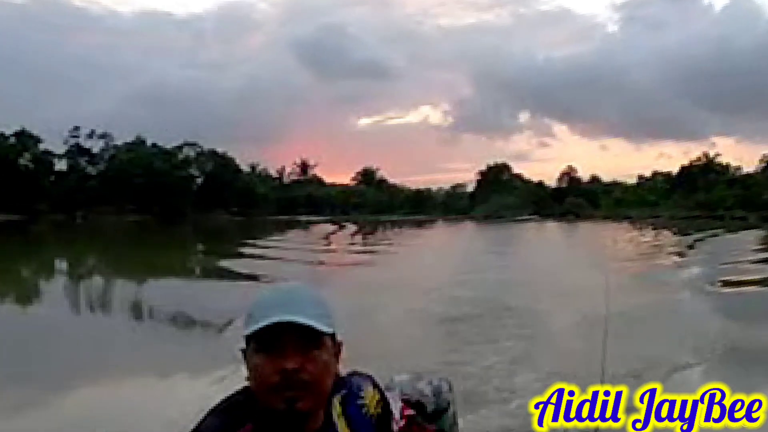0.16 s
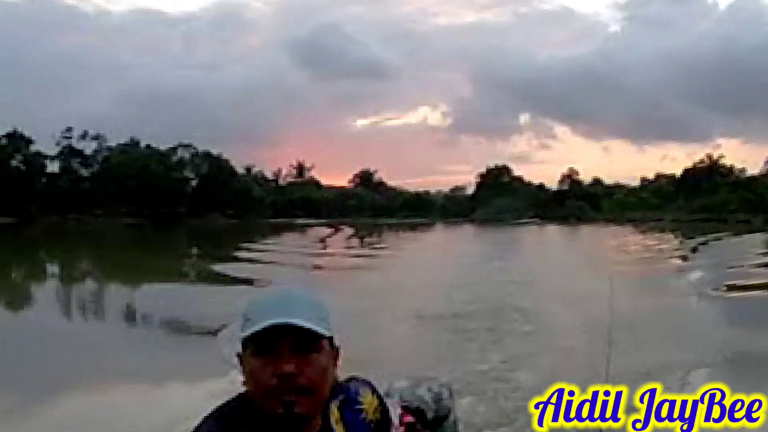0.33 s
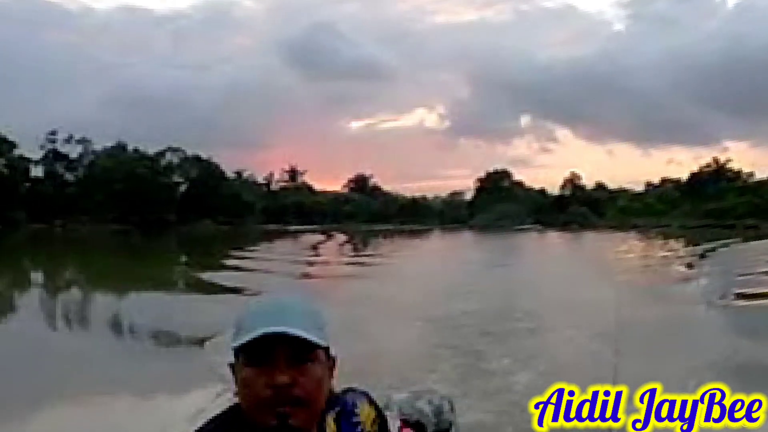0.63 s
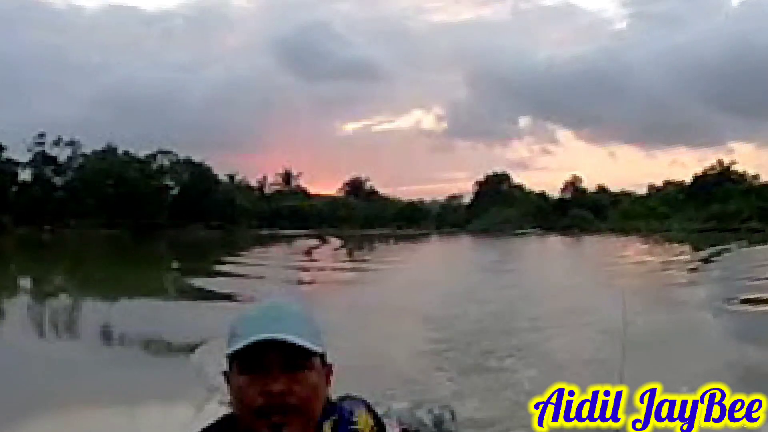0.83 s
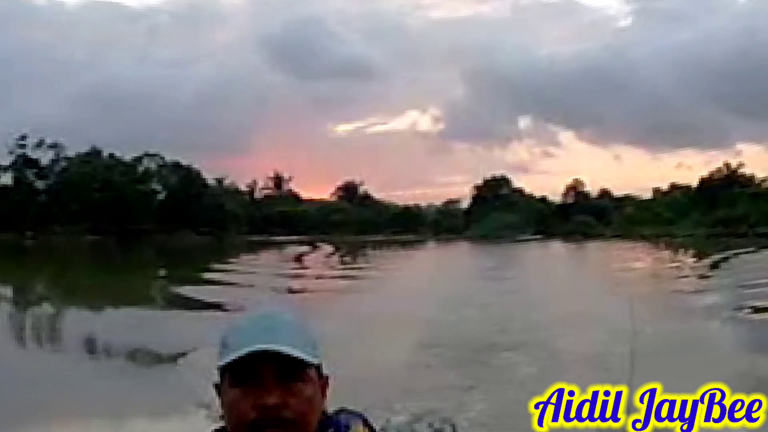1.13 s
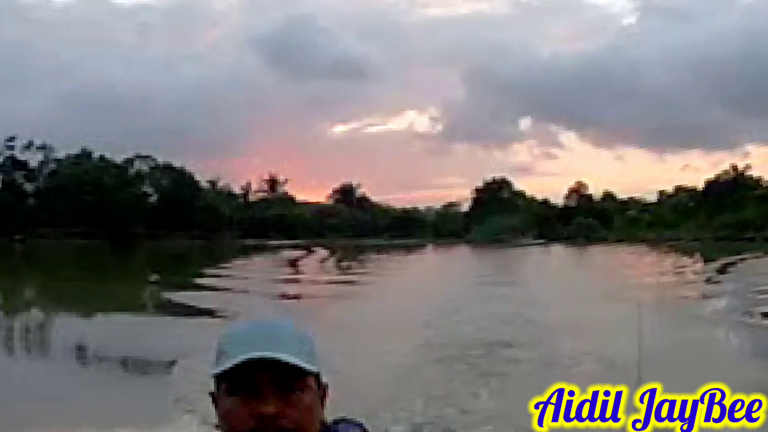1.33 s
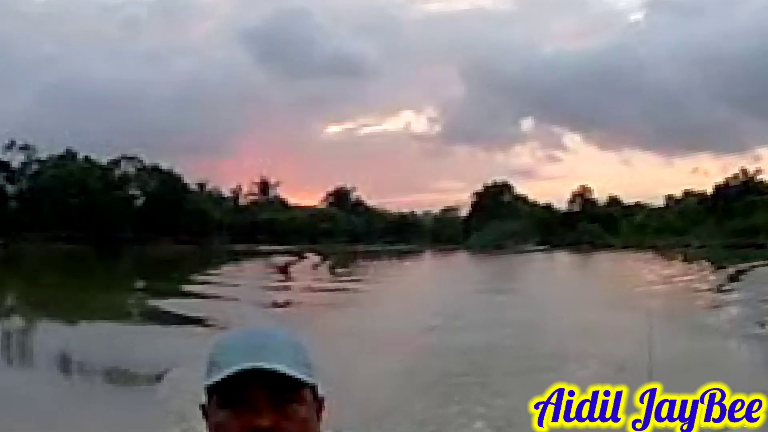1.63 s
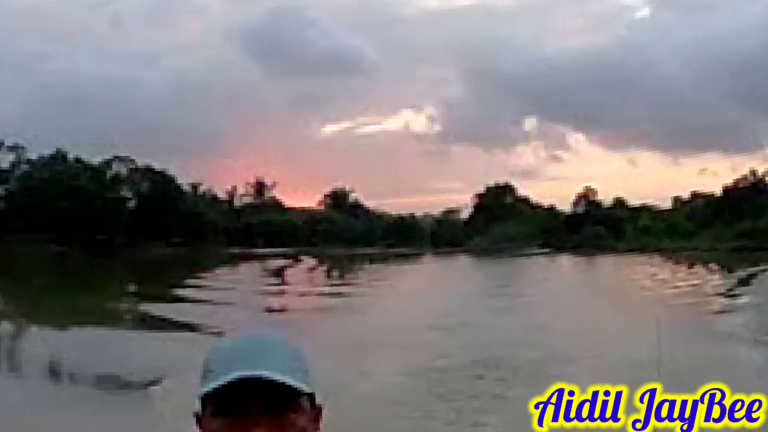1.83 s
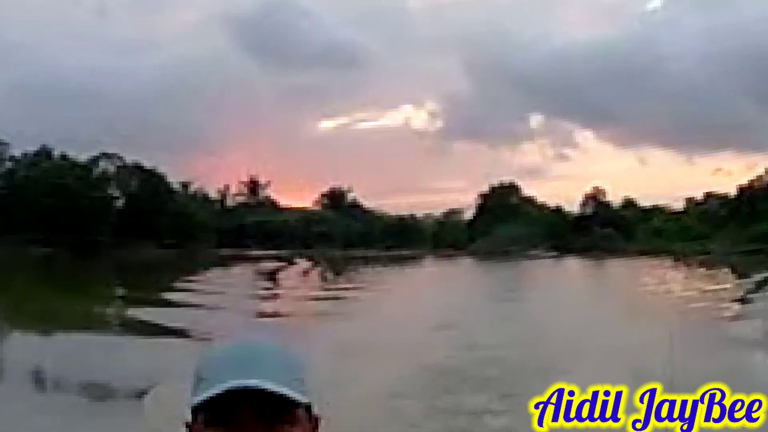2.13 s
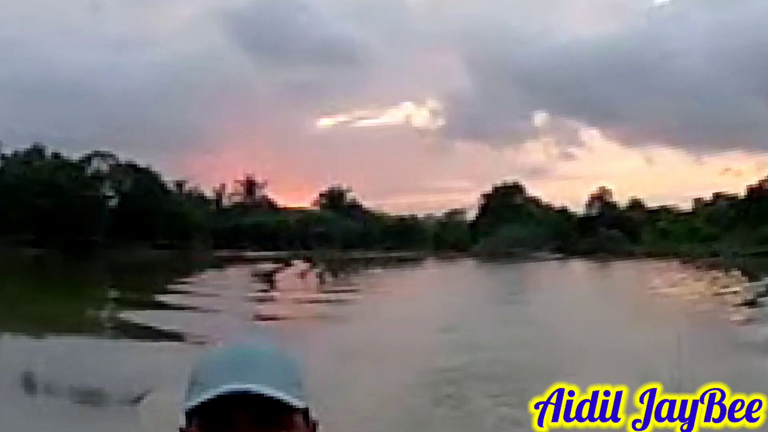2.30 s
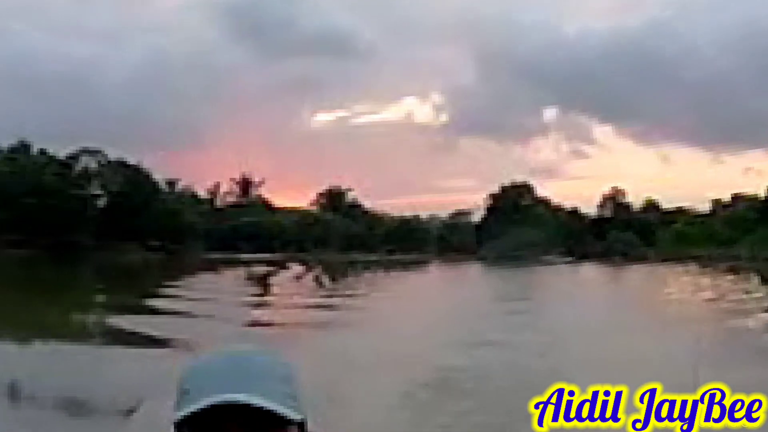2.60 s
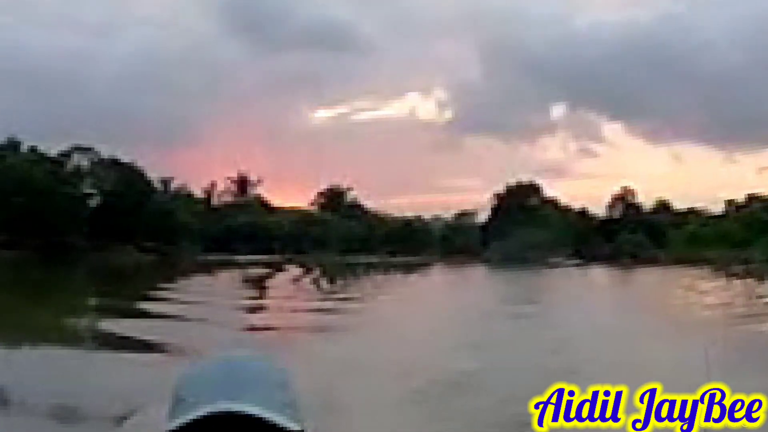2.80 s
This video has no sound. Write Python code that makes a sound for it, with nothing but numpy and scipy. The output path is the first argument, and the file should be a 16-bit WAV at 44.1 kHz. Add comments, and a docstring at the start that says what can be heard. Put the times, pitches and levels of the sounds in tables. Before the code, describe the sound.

An outboard motor drones at a constant speed for the whole three seconds, heard on board a small boat, with a rough low burble, a buzzing rattle and a fast, bright clatter. Beneath it the wake hisses steadily and a few drops splash close by. From about 2.7 seconds, water slaps the hull in two quick clusters of soft, low thuds as churning swells.

```python
"""An outboard motor drives a small boat along a calm river, heard on board a few steps away.
The exhaust drones on multiples of the engine's cycle rate, over a rough burble that puffs once a cycle.
The engine block buzzes, the cover rattles and the valves clatter. The wake hisses and spits spray.
Near the end the hull meets a ripple and thumps through it."""
import sys
import numpy as np
from scipy import signal
from scipy.fft import rfft, irfft, next_fast_len
from scipy.io import wavfile
from scipy.ndimage import uniform_filter1d, map_coordinates

SR = 44100
rng = np.random.default_rng(int(sys.argv[2]) if len(sys.argv) > 2 else 0)


def dump(signal):
    """Clip the signal to [-1, 1] and save it as 16-bit WAV at the path in sys.argv[1]."""
    limited = np.clip(np.atleast_2d(signal).T, -1, 1)
    pcm = np.round(limited * 32767).astype(np.int16)
    wavfile.write(sys.argv[1], SR, pcm)


N = 130095

# tone colour of the foam's hiss: f/Hz, relative level/dB
FOAM_COLOUR = [(300, -8.5), (1000, -4), (2200, -4.5), (3400, -6.5), (4500, -6.5), (6400, -11), (8100, -10),
               (9200, -19), (11000, -33), (13700, -33), (15000, -30)]
# drops landing close by: t/s, level/dB
CLOSE_DROPS = [(.068, -22), (1.0664, -28), (1.4553, -20), (1.845, -31), (2.565, -16), (2.634, -24),
               (2.733, -26), (2.9305, -28)]
# tone colour of those drops: f/Hz, gain/dB
CLOSE_DROP_COLOUR = [(2000, -25), (5500, -9), (6800, 2), (8200, -1), (9500, 0), (11500, -11), (13500, -17),
                     (15200, -8)]
# water slapping the hull: t/s, level/dB, f/Hz, length/s
HULL_SLAPS = [(2.731, -5, 150, 0.0083), (2.7645, -12, 190, .006), (2.786, -18, 140, 0.011),
              (2.808, -19, 150, 0.0065), (2.8955, -7, 150, .011), (2.901, -12, 251.4, .009),
              (2.918, -12, 161, 0.016), (2.933, -21, 139, .009), (2.941, -9, 140, 0.011),
              (2.947, -7, 357, .011)]
# water churning under the hull: t/s, level/dB
CHURN_LEVEL = [(0, -68), (2.4, -47), (2.7, -38), (2.74, -24), (2.86, -33), (2.9, -25.5), (2.95, -14)]
# tone colour of the churning: f/Hz, relative level/dB
CHURN_TONE = [(20, -22), (50, 0), (120, -7), (250, 1.5), (400, -0.5), (700, -14), (1500, -40), (4000, -55)]
# slight swell of the foam and valves together: t/s, gain/dB
TREBLE_SWELL = [(0, 0), (.4, -1.5), (.7, .5), (1.05, .5), (1.3, -0.3), (1.8, -.5), (1.97, 0.5), (2.4, -0.2),
                (2.7, 1), (2.95, 1)]
# a low and a high ringing of the motor's body: t/s, level/dB
LOW_RING_SWELL = [(0, -48), (.13, -36), (.23, -38.5), (.33, -47), (.46, -36), (.6, -40), (1.4, -49),
                  (1.47, -39), (1.55, -45), (1.64, -34.5), (1.75, -46), (2.6, -47), (2.7, -41), (2.8, -59)]
HIGH_RING_SWELL = [(0, -52), (.45, -49), (.57, -40), (.68, -53), (1.65, -46), (1.78, -53), (1.95, -44),
                   (2.2, -59), (2.32, -42), (2.57, -62), (2.77, -42), (2.95, -52)]
# tone colours of the cover, the valves and the exhaust's burble: f/Hz, relative level/dB
COVER_COLOUR = [(300, -51), (700, -9.5), (1150, 1), (1400, -2.5), (1900, -3.5), (2300, -7.5), (3300, -13.5),
                (5000, -24), (9000, -50)]
VALVE_COLOUR = [(1200, -27), (2500, -5.5), (3400, -7), (4300, -2), (5400, -4), (6300, 1), (7200, -3),
                (8100, -8.5), (9100, -3.5), (10200, -10), (11200, -17), (13700, -23.5), (14800, -17),
                (15500, -15)]
BURBLE_COLOUR = [(20, -42), (35, -31), (50, -19), (62, -36), (80, -4), (110, -3.5), (165, 3), (215, -1.5),
                 (275, -2), (330, -12), (385, -1), (440, -9), (490, -6.5), (540, -7.5), (585, 0.5),
                 (630, -4.5), (700, -12), (830, -10.5), (1000, -15.5), (1400, -23), (3000, -63)]
# engine speed, in working cycles a second: t/s, f/Hz
CYCLE_RATE = [(0.0, 46.45), (0.52, 46.51), (0.62, 46.7), (0.69, 46.4), (1.19, 46.26), (1.27, 46.23),
              (2.03, 46.49), (2.1, 46.81), (2.32, 46.46), (2.46, 46.5), (2.52, 46.42), (2.67, 46.59),
              (2.82, 45.9), (2.95, 45.9)]
# tones of the engine block and of the exhaust: multiple of the cycle rate, relative level/dB
BLOCK_TONES = [(26, -30.5), (28, -31), (31, -38), (33, -30), (37, -27.5), (39, -27.5), (40, -33.5),
               (41, -26.5), (43, -31.5)]
EXHAUST_TONES = [(2, -3), (3, -25), (4, 0), (7, -25), (9, -18.5), (10, -24.5), (12, -23), (13, -5.5),
                 (14, -33.5), (16, -25), (18, -29), (19, -29.5), (20, -36)]
# strength of the exhaust's drone: t/s, gain/dB
DRONE_GAIN = [(0, -23.5), (.8, -22.5), (1.5, -23), (1.68, -25), (1.76, -24.5), (1.83, -22), (2.4, -22.5),
              (2.95, -21)]
# two more exhaust tones, at 5 and 8 times the cycle rate: t/s, level/dB
FIFTH_LEVEL = [(0, -34), (.6, -32), (1.15, -35), (1.24, -35), (1.32, -36), (1.55, -38), (1.73, -34.5),
               (1.85, -39), (1.98, -40), (2.17, -41), (2.28, -31), (2.95, -27.5)]
EIGHTH_LEVEL = [(0, -35), (.27, -38.5), (.5, -50), (.6, -34), (1.1, -35.5), (1.19, -34), (1.27, -33),
                (1.38, -34), (1.6, -39), (1.67, -34), (2.3, -36), (2.95, -41.5)]


def amp(db):
    """Decibels to gain."""
    return 10 ** (np.asarray(db) / 20)


def unit(x):
    """Scale to rms 1."""
    return x / np.sqrt(np.mean(x ** 2) + 1e-20)


def curve(rows):
    """(s, value) points as one value per sample."""
    return np.interp(np.arange(N) / SR, *np.transpose(rows))


def wobble(rate):
    """A smooth random curve, rate knots a second."""
    return map_coordinates(rng.standard_normal(2000), [np.arange(N) * rate / SR + 4], mode="wrap")


def filtered(x, response):
    """x times a response of frequency."""
    m = next_fast_len(N + 8192)
    return irfft(rfft(x, m) * response(np.fft.rfftfreq(m, 1 / SR)), m)[:N]


def coloured(x, points):
    """x through a spectrum of (Hz, dB) points."""
    f, db = np.transpose(points)
    return filtered(x, lambda hz: amp(np.interp(np.log(hz + 1), np.log(f + 1), db)))


def noise(points):
    """Coloured noise of rms 1."""
    return unit(coloured(rng.standard_normal(N), points))


def add(track, s, sound):
    """Mix a sound in at time s."""
    part = track[max(0, round(s * SR)):][:len(sound)]
    part += sound[:len(part)]


def patchy_noise(colour, depth_db):
    """Coloured noise whose narrow bands swell and fade separately."""
    bands = signal.stft(rng.standard_normal(N), nperseg=512)[2]
    swells = uniform_filter1d(rng.standard_normal(bands.shape), size=4, axis=0)  # smooth over pitch
    swells = uniform_filter1d(swells, size=12, axis=1)  # smooth over time
    uneven = signal.istft(bands * amp(depth_db * unit(swells)), nperseg=512)[1][:N]
    return unit(coloured(uneven, colour))


def engine_tones(cycles, tones, flutter, jitter):
    """Tones on multiples of the cycle rate; flutter shakes their strength, jitter their timing."""
    shake_hz = 45.18
    out = np.zeros(N)
    for multiple, db in tones:
        offset = 0.044 * rng.uniform(-1.026, 1)  # small, so low tones stay in step as one pulse
        phase = 2 * np.pi * round(multiple) * (cycles + offset) + jitter * wobble(shake_hz)
        strength = amp(db) * (1 + flutter * wobble(shake_hz))
        out -= strength * np.sqrt(2) * np.cos(phase)
    return out


def side_echoes(sound, spread_s=.016, echo_db=-11.5):
    """Eight quick echoes off the boat's sides colour the sound."""
    taps = np.zeros(SR // 20)
    taps[0] = 1  # the direct sound
    for delay, size in rng.random((8, 2)):
        taps[int(spread_s * SR * (.1 + delay))] += amp(echo_db) * (2 * size - 1)
    return signal.fftconvolve(sound, taps / np.linalg.norm(taps))[:N]


def foam():
    """The wake foams behind the boat with a steady hiss."""
    return amp(-41 + 1.1 * wobble(25.1)) * patchy_noise(FOAM_COLOUR, depth_db=-0.5)


def spray(drops_per_s=110, centre_hz=7000, spread_octaves=0.28, fade_s=0.0043):
    """A few close drops splash as bursts of noise; many fine ones ping, each at its own pitch."""
    t = np.arange(SR // 50) / SR
    fade = amp(-60 * t / fade_s)
    close, fine = np.zeros(N), np.zeros(N)
    for s, db in CLOSE_DROPS:
        add(close, s, amp(db) * fade * rng.standard_normal(len(t)))
    for when, softness, pitch in rng.random((1500, 3))[:int(drops_per_s * N / SR)]:
        hz = centre_hz * 2 ** (spread_octaves * (2 * pitch - 1))
        db = -41 - 2 * np.log(max(softness, .03))  # most are faint, a few are louder
        add(fine, when * N / SR, amp(db) * fade * np.sin(2 * np.pi * hz * t))
    return coloured(close, CLOSE_DROP_COLOUR) + fine


def hull(low_cut_hz=83):
    """Water slaps the hull in short, soft thuds while the churning under it swells."""
    t = np.arange(N) / SR
    thuds = np.zeros(N)
    for s, db, hz, length in HULL_SLAPS:
        rise_and_fall = np.exp(-(2 * (t - s) / length) ** 2)
        thuds += amp(db) * rise_and_fall * np.sin(2 * np.pi * hz * (s - t))
    thuds = filtered(thuds, lambda hz: hz ** 4 / (hz ** 4 + low_cut_hz ** 4))  # little deep bass
    return thuds + amp(curve(CHURN_LEVEL)) * noise(CHURN_TONE)


def body_ring(swell, centre_hz, width_hz):
    """The motor's body rings around one pitch: a narrow band of noise that flares up and fades."""
    band = filtered(rng.standard_normal(N), lambda hz: 1 / (1 + ((hz - centre_hz) / width_hz * 1.2) ** 2))
    return amp(curve(swell)) * unit(band)


def cover():
    """The motor's cover rattles: noise with a fast, uneven tremble."""
    return amp(-38.5 + 1.3 * wobble(120)) * patchy_noise(COVER_COLOUR, depth_db=2.2)


def valves(cycles, decay_cycles=0.18, second_beat=0.58):
    """The valves clatter brightly twice a cycle, the second beat weaker."""
    accent = np.where(cycles % 1 < .5, 1, second_beat)
    beats = accent * np.exp(-(cycles % .5) / decay_cycles)
    strength = 0.64 + beats * amp(3.4 * wobble(90))  # some noise stays between beats
    level = amp(-38.5 + 0.2 * wobble(25.27))
    return level * unit(strength * patchy_noise(VALVE_COLOUR, depth_db=1.0))


def engine_block(cycles, whine_multiple=12.48):
    """The block buzzes with high, shaky tones, beside one faint whine."""
    buzz = amp(-25) * engine_tones(cycles, BLOCK_TONES, flutter=.4, jitter=.3)
    whine_phase = 2 * np.pi * whine_multiple * cycles + .8 * wobble(7.76)
    return buzz + amp(-45) * np.sqrt(2) * np.sin(whine_phase)


def exhaust(cycles):
    """The engine's firings make a clean drone and a rough burble that puffs once a cycle."""
    drone = amp(curve(DRONE_GAIN)) * engine_tones(cycles, EXHAUST_TONES, flutter=.06, jitter=.037)
    fifth = amp(curve(FIFTH_LEVEL)) * engine_tones(cycles, [(5, 0)], flutter=.1, jitter=.1)
    eighth = amp(curve(EIGHTH_LEVEL)) * engine_tones(cycles, [(8, 0)], flutter=.1, jitter=.1)
    puffs = amp(2.95 * np.cos(2 * np.pi * cycles) + 1.94 * wobble(12))
    burble = amp(-29) * unit(puffs * noise(BURBLE_COLOUR))
    return drone + fifth + eighth + burble


def scene():
    """Motor and water, heard from one place in the boat."""
    cycles = np.cumsum(curve(CYCLE_RATE)) / SR  # engine cycles counted so far
    motor = exhaust(cycles) + engine_block(cycles) + cover()
    motor += body_ring(LOW_RING_SWELL, centre_hz=790, width_hz=106)
    motor += body_ring(HIGH_RING_SWELL, centre_hz=1858, width_hz=200)
    treble = amp(curve(TREBLE_SWELL)) * side_echoes(valves(cycles) + foam())
    return (motor + treble + hull() + spray())[None]


def record(dry):
    """Cut away the very highest treble."""
    top_hz = 15550
    return filtered(dry[0], lambda hz: hz < top_hz)[None]


dry = scene()
out = record(dry)
dump(out)
```